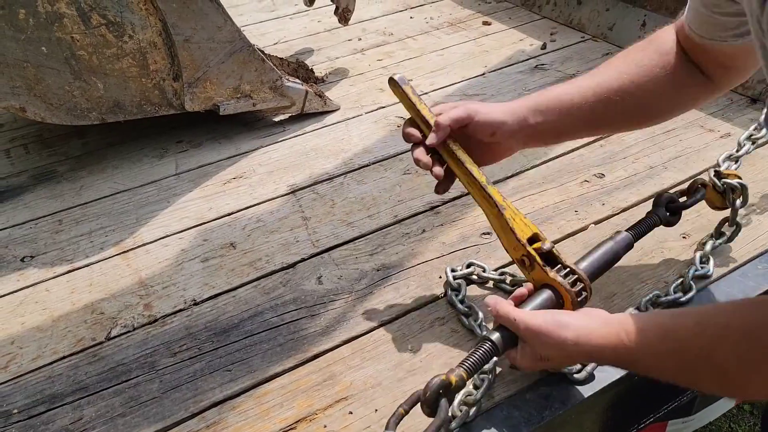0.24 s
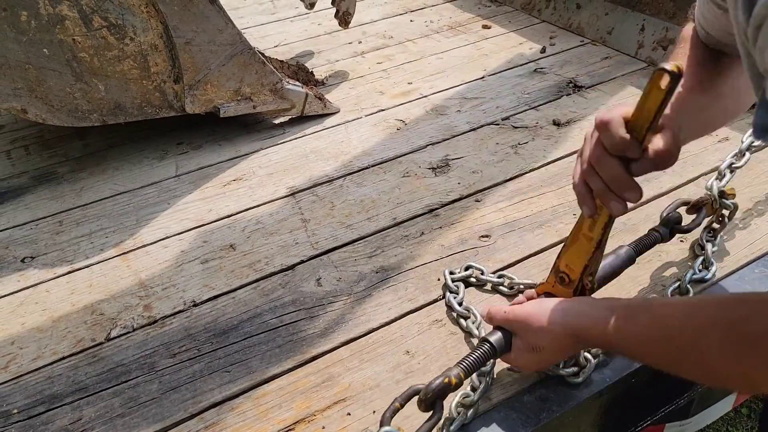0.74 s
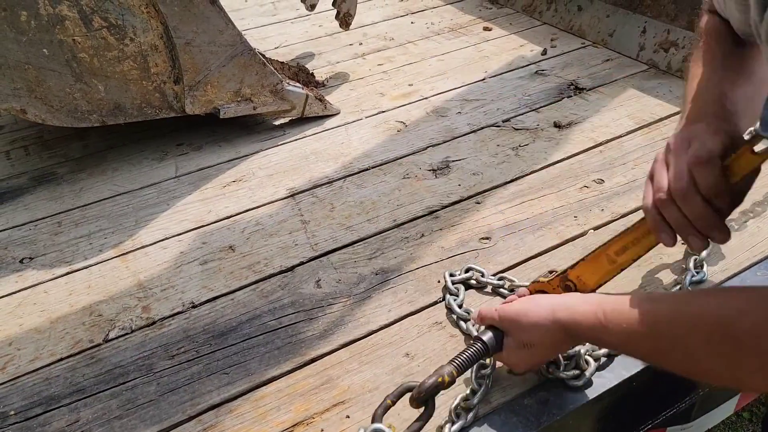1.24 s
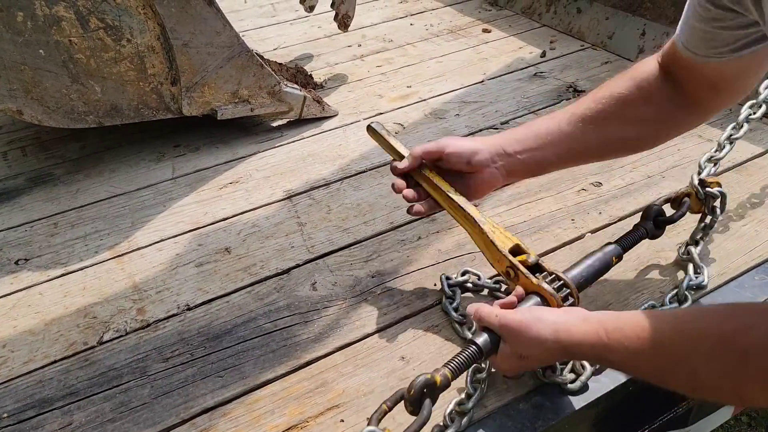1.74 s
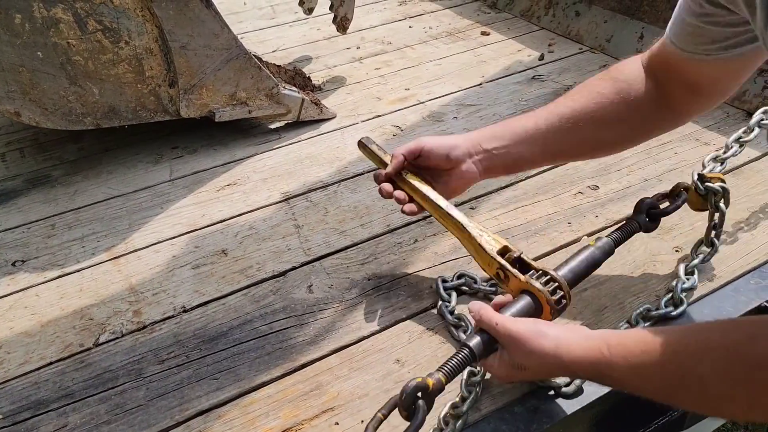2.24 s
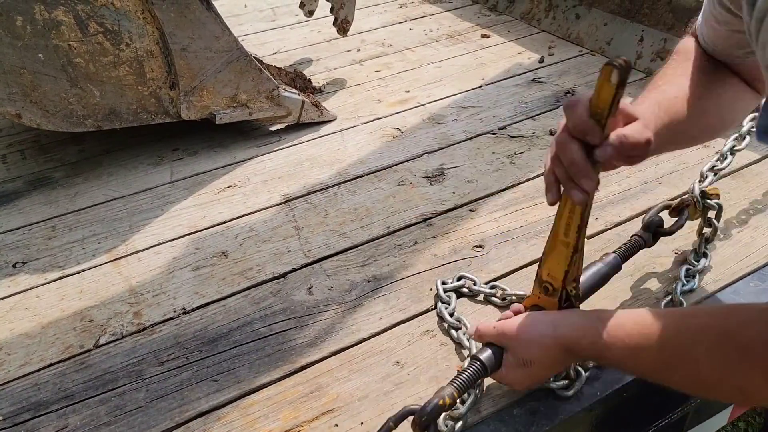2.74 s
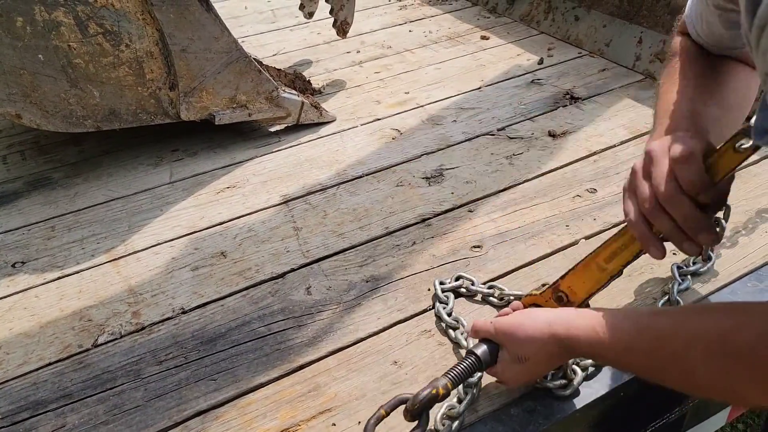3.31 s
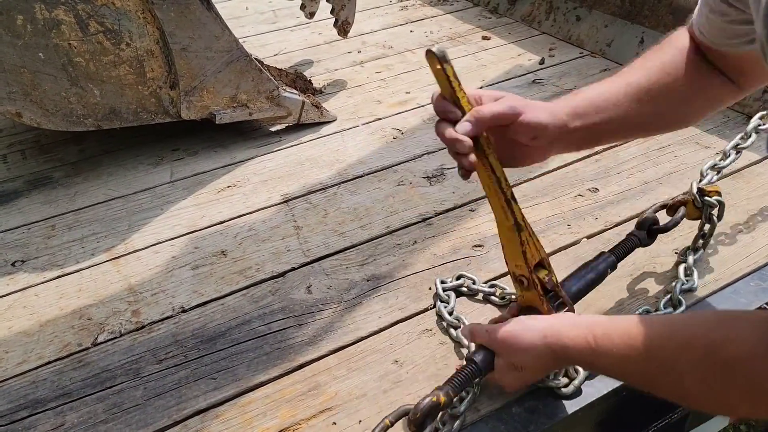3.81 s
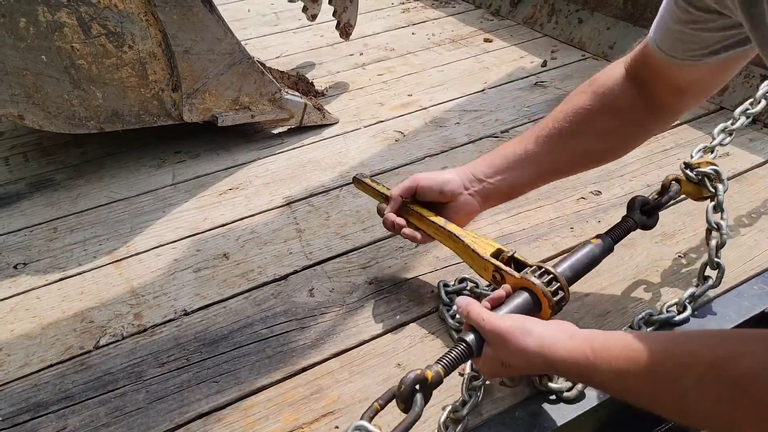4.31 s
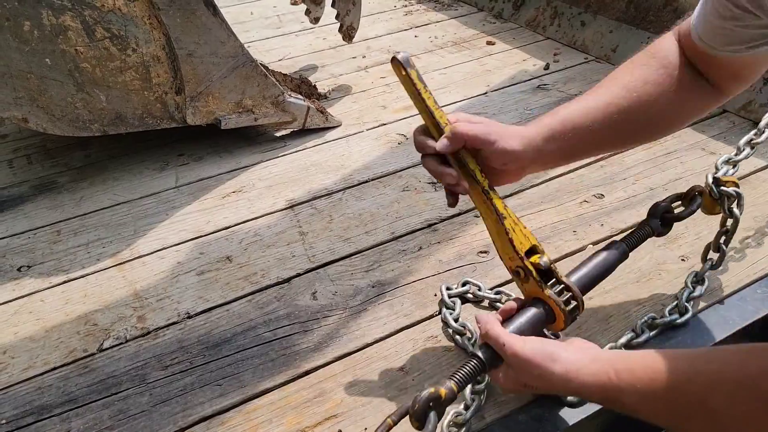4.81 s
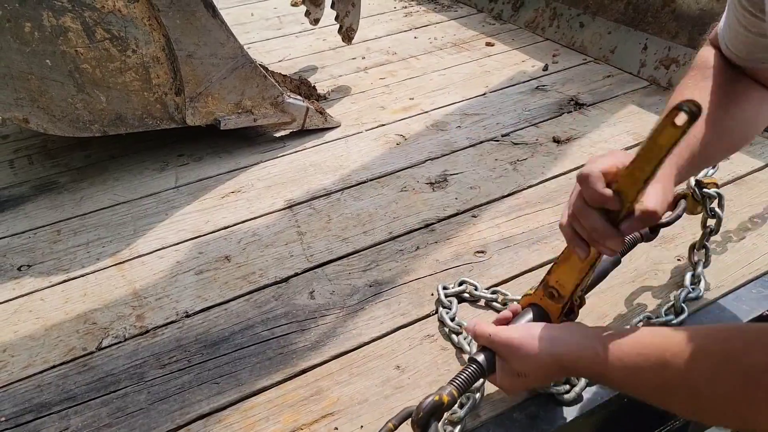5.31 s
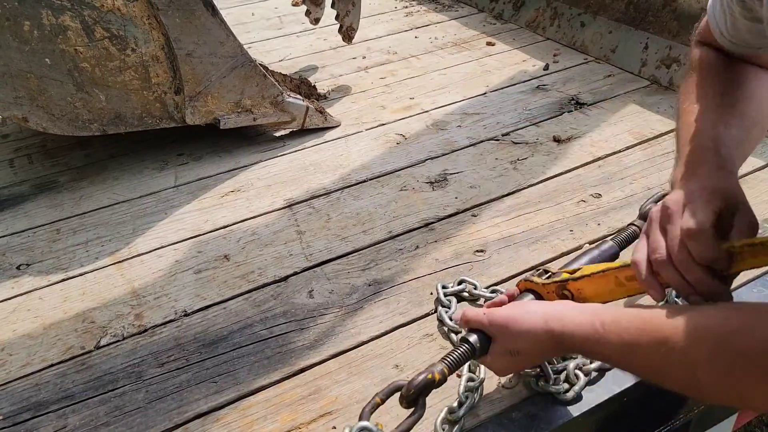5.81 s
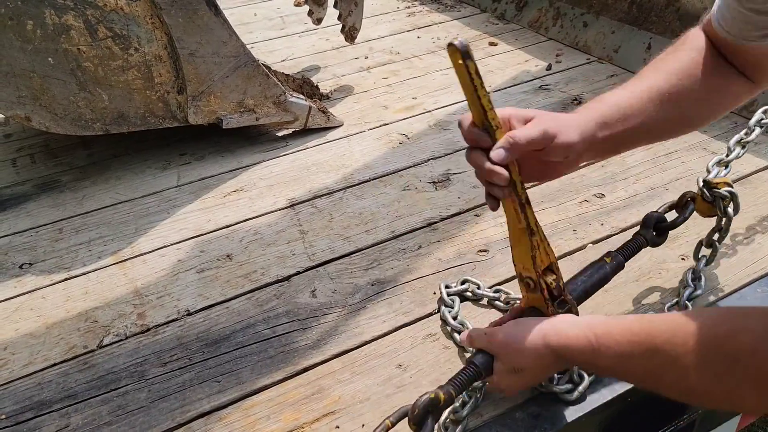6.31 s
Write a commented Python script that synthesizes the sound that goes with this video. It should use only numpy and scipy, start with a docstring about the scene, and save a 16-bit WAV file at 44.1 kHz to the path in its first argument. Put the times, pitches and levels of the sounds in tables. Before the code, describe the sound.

Close by, a chain is tightened with a hand ratchet in about eleven even strokes. Slack metal clanks and knocks on wooden trailer boards, the pawl snaps over a few teeth in a quick bright run, and another clank follows as the handle turns and the chain pulls tight. Links tinkle in between. The setting is an open yard with little echo, a soft hush and light wind on the microphone.

```python
"""Outdoors, on a wooden trailer deck: a ratchet load binder is cranked.
On each back swing the slack binder and chain clank, the deck thuds and the pawl snaps over 4-6 teeth.
At the turn of the handle the pawl seats and the chain clanks taut.
Light wind rumbles on the microphone over a distant hush."""
import sys
import numpy as np
from scipy import signal
from scipy.io import wavfile

SR = 44100
rng = np.random.default_rng(int(sys.argv[2]) if len(sys.argv) > 2 else 0)


def wrap_up_sound(samples):
    """Save the sound to the file named by the first command line argument, as 16-bit audio."""
    columns = np.atleast_2d(samples).T
    # keep every value between -1 and 1, then stretch to whole-number steps
    tamed = np.clip(columns, -1, 1)
    steps = np.round(tamed * 32767).astype(np.int16)
    wavfile.write(sys.argv[1], SR, steps)


N = 288840
EDGES_HZ = np.geomspace(22, 17000, 27)
CENTRES_HZ = np.sqrt(EDGES_HZ[1:] * EDGES_HZ[:-1])
RING_T_S = np.arange(int(.3 * SR)) / SR

# load comes off: main clank t/s, level/dB, first knock lead/s, level/dB, chain fall/s, landing level/dB
RELEASES = [(0.0014, -18, 0.029, -32, 0.0075, -21), (0.594, -19, .052, -26, .021, -16),
            (1.2113, -15.5, 0.03, -23, 0.031, -19.5), (1.8822, -12.5, 0.037, -35.5, 0.07, -20.5),
            (2.589, -14, 0.054, -21, 0.011, -24), (3.2356, -15.5, 0.027, -25.5, 0.063, -21),
            (3.87, -12.5, 0.016, -26, .03, -17.5), (4.5082, -12.5, 0.018, -27, .068, -13),
            (5.1611, -10.5, 0.025, -29, .021, -29.5), (5.7732, -10, 0.023, -34, 0.041, -17),
            (6.4018, -15.5, .0285, -22, 0.021, -21)]
# dense modes of a struck link: f/Hz, density/dB, t60/s
LINK_BANDS = [(500, 0.5, 0.02), (1440, 4, 0.0047), (2780, 10.5, 0.012), (5680, 6, 0.021),
              (8830, -26.5, 0.023), (16160, -12.5, 0.0088)]


def pawl(bands):
    """The pawl scrapes up a tooth and its spring throws it on the next: wheel clacks, pawl pings."""
    # dense ratchet modes: f/Hz, density/dB, t60/s
    clack_bands = [(300, -16.5, 0.096), (983, -2.5, 0.021), (2720, -1.5, 0.087), (5830, 3, 0.018),
                   (8100, -5, .025), (12500, -6.5, .022), (15500, -1.5, 0.047)]
    # wheel and handle: f/Hz, level/dB, t60/s
    wheel_modes = [(2000, -4, 0.02), (2950, -0.5, 0.03), (3367, -4.5, 0.021), (4454, -6.5, 0.029),
                   (6630, -7.5, 0.033), (6895, -7.5, 0.041)]
    t = np.arange(int(.06 * SR)) / SR
    slide_s, pan_spread_db = .009, 2.8
    out, decay = np.zeros((2, N)), decays(clack_bands, t)
    slide_env = decays(clack_bands, 0 * t) * (t < slide_s) * t / slide_s
    crack_env = decay * np.exp(-t / .0007)
    for s, clack_db, ping_db in teeth():
        snap = rattle(dense_modes(bands, decay), spread_s=.0032, bounce_db=5, count=3)
        wheel = ring(wheel_modes, t, spread_db=5, detune=.025)
        wheel = rattle(wheel, spread_s=.003, bounce_db=-4.5, count=2)
        crack = dense_modes(bands, crack_env)
        clack = from_db(clack_db - 10) * (snap + from_db(-.6) * wheel + from_db(-7) * crack)
        ping = from_db(ping_db - 2.5) * chatter(t, spread_s=.005, count=3)
        pan = from_db(rng.normal(0, pan_spread_db) * np.array([[.5], [-.5]]))
        add(out, s - slide_s, from_db(clack_db - 24) * dense_modes(bands, slide_env))
        add(out, s + .0008, clack * pan)
        add(out, s + .00099, ping * pan * from_db([[.9], [-.9]]))
    return out


def teeth():
    """The handle slows, and slower teeth clack softer. Rows: t/s, clack/dB, ping/dB."""
    # back swings: first tooth t/s, last but one t/s, last t/s, teeth,
    # clack/dB, first ping/dB, ping step/dB per tooth, last ping/dB
    swings = [(0.0172, 0.0833, 0.1211, 4, -11.5, -9.5, -2.5, -20),
              (0.644, 0.7134, 0.7514, 4, -13, -12, -1.2, -20),
              (1.273, 1.3422, 1.3786, 4, -12, -10.5, -5.5, -21),
              (1.9252, 2.031, 2.094, 5, -13.5, -16, 2, -19.5),
              (2.6232, 2.693, 2.7262, 4, -13.5, -10, -1.2, -16.5),
              (3.271, 3.3672, 3.4123, 5, -13, -11.5, 0.46, -42),
              (3.8925, 4.017, 4.0745, 6, -13.5, -21.5, 2, -16),
              (4.5667, 4.6567, 4.7238, 5, -12, -11, -2.5, -15.5),
              (5.2, 5.287, 5.3458, 5, -14.5, -10.5, -1.5, -38),
              (5.83, 5.8948, 5.947, 4, -13, -17, 0, -22.5),
              (6.4327, 6.492, 6.5227, 4, -15.5, -7.5, -5.5, -13.5)]
    gap_growth, gap_doubling_db = .03, -5.5
    rows = []
    for first_s, penultimate_s, last_s, count, clack_db, ping_db, step_db, last_ping_db in swings:
        k = np.arange(round(count) - 1)
        travel = k * (1 + gap_growth * (k - 1) / 2)
        times_s = np.append(first_s + (penultimate_s - first_s) * travel / travel[-1], last_s)
        gap_ratio = np.append(1, np.diff(times_s) / (times_s[1] - times_s[0]))
        clacks_db = clack_db + gap_doubling_db * np.log2(gap_ratio)
        pings_db = np.append(ping_db + step_db * k, last_ping_db)
        rows += zip(times_s, clacks_db, pings_db)
    return rows


def chatter(t, spread_s, count):
    """The pawl skips on the tooth; each touch rings it anew."""
    # pawl: f/Hz, level/dB, t60/s
    pawl_modes = [(9054, 0, .033), (9370, -1, .033), (10755, -7, .033), (11003, -10, .03),
                  (15500, -14, .025)]
    out = np.zeros((2, len(t)))
    for k, jitter in enumerate(rng.random(count)):
        age = (k + jitter * (k > 0)) / count
        add(out, age * spread_s, np.exp(-age) * ring(pawl_modes, t, spread_db=4, detune=.009))
    return unit_blow(out)


def slack():
    """Slack opens and closes. Clanks: t/s, level/dB, body/dB, ring/dB. Thuds: t/s, level/dB."""
    # load taken up: pawl seats t/s, level/dB, chain taut delay/s, level/dB
    take_ups = [(0.2585, -21, 0.0034, -23.5), (0.368, -28, 0.003, -29.5), (0.916, -16.5, 0.014, -17),
                (1.5262, -15.5, 0.03, -14), (2.212, -16, 0.013, -16.5), (2.8991, -17.5, 0.016, -19),
                (3.541, -23.5, 0.01, -19.5), (4.1942, -27.5, .0189, -15), (4.8169, -24.5, 0.024, -21),
                (5.4591, -20, 0.033, -19), (6.0671, -17, 0.0063, -22)]
    # hanging chain nudges the planks: t/s, level/dB
    nudges = [(2.827, -30.5), (3.509, -31), (6.325, -32)]
    slack_ring_db, taut_ring_db, usual_landing_db = 4, 3.5, -19
    clanks, thuds = [], list(nudges)
    for s, level_db, lead_s, knock_db, fall_s, landing_db in RELEASES:
        # links clank again during the fall, louder with a heavier landing
        run_out_db = level_db - 2.5 + .49 * (landing_db - usual_landing_db)
        clanks += [(s - lead_s, knock_db, knock_db - 11.5, slack_ring_db),
                   (s, level_db, level_db - 11.5, slack_ring_db),
                   (s + .72 * fall_s, run_out_db, landing_db - 2.5, slack_ring_db)]
        thuds.append((s + fall_s, landing_db))
    for s, seat_db, delay_s, taut_db in take_ups:
        clanks += [(s, seat_db, seat_db - 11.5, taut_ring_db),
                   (s + delay_s, taut_db, taut_db - 12, taut_ring_db)]
        thuds.append((s + delay_s + .00771, taut_db - 11))   # taut chain jolts the deck
    return clanks, thuds


def binder(bands, clanks):
    """A slide, a crack and a rattle of links ring the steel; the heavy low modes swell just after."""
    # barrel, hooks and chain: f/Hz, level/dB, t60/s
    binder_modes = [(600, -6, .17), (715, -1, .17), (868, -8, .17), (1318, -3, .14), (1470, -8, .11),
                    (1628, -4, .14), (1754, -8, .11), (2600, 4, .13), (2675, -2, .1), (2745, -1, .1),
                    (2890, -3, .1), (3090, -3, .1), (3227, -3, .12), (3335, -3, .12), (3885, -6, .09),
                    (4235, -3, .11), (4420, -6, .09), (4844, -10, .08), (6712, -10, .07)]
    # dense chain modes: f/Hz, density/dB, t60/s
    chain_bands = [(400, -31.5, .15), (1015, -8.5, 0.11), (1500, 10, 0.06), (2100, -5, 0.14),
                   (2685, 11, 0.15), (4000, -2.5, 0.11), (5700, 2.5, 0.13), (7760, -12, 0.14),
                   (13000, -17, 0.12), (14900, -10, 0.034)]
    # dense barrel modes: f/Hz, density/dB, t60/s
    body_bands = [(150, -11, 0.16), (389.5, -6.5, 0.13), (700, 0.5, 0.21), (1040, -4, 0.028),
                  (1341, 8.5, 0.26), (2230, -58.5, 0.097), (5000, -45.5, .05)]
    out = np.zeros((2, N))
    chain_env, crack_env = decays(chain_bands, RING_T_S), decays(LINK_BANDS, RING_T_S)
    body_env = decays(body_bands, RING_T_S) * (1 - np.exp(-RING_T_S / .029))
    tone_attack = 1 - np.exp(-RING_T_S / .0027)
    for s, level_db, body_db, ring_db in clanks:
        links = rattle(dense_modes(bands, chain_env), spread_s=.02, bounce_db=-2.5, count=4)
        tones = tone_attack * ring(binder_modes, RING_T_S, spread_db=1.5, detune=.003)
        crack = dense_modes(bands, crack_env)
        slide = dense_modes(bands, chain_env)
        clank = unit_blow(links + from_db(ring_db) * tones + from_db(-3.5) * crack)
        add(out, s - .006, from_db(level_db - 22) * slide)
        add(out, s, from_db(level_db - 4) * clank)
        add(out, s, from_db(body_db - 3) * dense_modes(bands, body_env))
    return out


def deck(bands, thuds):
    """The chain knocks the planks: a dull thud and a short boom."""
    # dense deck modes: f/Hz, density/dB, t60/s
    deck_bands = [(60, -15.5, 0.52), (177, -3, 0.57), (262, -13, 0.44), (356, 1.5, 0.6), (450, 7, 0.043),
                  (600, -1, 0.051), (1000, 6, 0.039), (3000, -37, .06)]
    # planks: f/Hz, level/dB, t60/s
    plank_modes = [(340.3, -7, 0.37), (372.7, -4, 0.28), (635.3, 6, 0.091)]
    out, decay = np.zeros((2, N)), decays(deck_bands, RING_T_S)
    for s, level_db in thuds:
        boom = ring(plank_modes, RING_T_S, spread_db=1.5, detune=.023)
        add(out, s, from_db(level_db - 9) * (dense_modes(bands, decay) + boom))
    return out


def settling_links(bands, count):
    """After each release, single links slip against each other at uneven moments."""
    settle_s, fade_db = .11, -6.5
    slips = []
    for s, level_db, *_ in RELEASES:
        ages = (np.arange(count) + rng.random(count)) / count
        slips += [(s + settle_s * age, level_db + fade_db * age) for age in ages]
    return blows(bands, slips, LINK_BANDS, gain_db=-14)


def jingle(bands, clanks, count):
    """Links of the loose chain end touch after each clank, and now and then on their own."""
    # lightly touched link: f/Hz, density/dB, t60/s
    tink_bands = [(800, -18, .04), (2960, 1, 0.041), (8000, -10, 0.08), (16100, -12, 0.014)]
    # stray touches: t/s, level/dB
    ticks = [(0.196, -28), (0.8727, -32), (1.036, -37.5), (1.738, -33), (3.0817, -35), (4.421, -35.5),
             (4.9206, -26), (5.582, -32), (5.6676, -28)]
    swing_s = .081
    touches = []
    for s, level_db, *_ in clanks:
        for age, weakness in rng.random((count, 2)):
            touches.append((s + swing_s * age, level_db - 10 * age - 10 * weakness))
    return blows(bands, touches, tink_bands, gain_db=-17) + blows(bands, ticks, tink_bands, gain_db=-13)


def near_echo(bands, x):
    """Scatter from the planks and a bucket close by."""
    # reflections: f/Hz, density/dB, t60/s
    near_bands = [(492, 0.5, 0.33), (3044, -5, 0.12), (9000, -4, 0.088), (15000, -4, 0.12)]
    return reflections(bands, x, near_bands, length_s=.25, wet_db=-12.5)


def yard_echo(bands, x):
    """Long, faint echo of the yard."""
    # reflections: f/Hz, density/dB, t60/s
    yard_bands = [(100, 2.5, 1.2), (402, -0.5, 0.69), (791, -10.5, 1), (1424, -7, 0.57), (3000, -6, 0.33),
                  (5100, -17, 1.45), (9130, -7.5, 0.2), (15000, -29, .3)]
    return reflections(bands, x, yard_bands, length_s=1.3, wet_db=-20.5)


def wind(bands):
    """Lumpy rumble on the microphone; stronger gusts make smaller eddies and sound brighter."""
    # gusts: t/s, level/dB
    gusts = [(0.0, -56), (0.56, -37.5), (0.69, -45), (1.07, -36), (1.39, -50), (1.55, -39), (2.04, -45),
             (2.72, -44), (2.74, -49), (3.96, -44.5), (4.0, -39), (4.12, -65.5), (4.54, -52), (4.58, -44),
             (5.05, -56.5), (5.11, -41.5), (5.44, -57), (5.49, -41.5), (5.97, -44.5), (6.26, -58.5),
             (6.46, -44), (6.55, -49)]
    # rumble spectrum: f/Hz, density/dB
    rumble_bands = [(25, -17), (45, -3.5), (70, 1), (110, -6), (160, -17), (300, -31), (800, -50.5),
                    (3000, -77)]
    pivot_hz, tilt_per_octave, flutter_hz, flutter_db = 70, .18, 12, 2.5
    gust_db = np.interp(np.arange(N) / SR, *np.transpose(gusts))
    lowpass = signal.butter(2, flutter_hz, fs=SR, output="sos")
    eddies = unit_rms(signal.sosfilt(lowpass, rng.standard_normal((2, N))))
    octaves = np.minimum(np.log2(CENTRES_HZ / pivot_hz), 1)
    tilt_db = tilt_per_octave * np.outer(octaves, gust_db - gust_db.mean())
    colour_db = per_band(rumble_bands)[0][:, None] + tilt_db
    rumble = np.einsum("bt,bct->ct", from_db(colour_db), bands)
    return from_db(gust_db + 1.86) * unit_rms(rumble * from_db(flutter_db * eddies))


def hush(bands):
    """Steady distant noise."""
    # spectrum: f/Hz, density/dB
    air_bands = [(100, -5), (250, -6), (700, -10), (1300, -15), (3000, -16), (5000, -28.5), (8000, -30),
                 (15500, -37.5)]
    air = np.tensordot(from_db(per_band(air_bands)[0]), bands, axes=1)
    return from_db(-52.5) * unit_rms(air)[:, ::-1]   # reversed: decorrelated from the wind


def dense_modes(bands, envelopes):
    """Modes too dense to tell apart: a random stretch of noise, shaped band by band."""
    size = envelopes.shape[1]
    start = rng.integers(SR // 10, N - size)
    return unit_blow(np.einsum("bct,bt->ct", bands[:, :, start:start + size], envelopes))


def ring(modes, t, spread_db, detune):
    """Clear modes; each blow reseats the parts, shifting pitch, strength and phase."""
    hz, level_db, t60_s = np.transpose(modes)
    hz = hz * (1 + detune * rng.standard_normal(len(hz)))
    gains = from_db(level_db + spread_db * rng.standard_normal((2, len(hz))))
    phasors = np.exp(2j * np.pi * rng.random((2, len(hz))))
    poles = 2j * np.pi * hz - np.log(1000) / t60_s
    return unit_blow(np.real((gains * phasors) @ np.exp(np.outer(poles, t))))


def rattle(sound, spread_s, bounce_db, count):
    """A first contact, then uneven, dying bounces within twice spread_s."""
    out = sound.copy()
    for k, (jitter, size) in enumerate(rng.random((count, 2))):
        age = 2 * (k + jitter) / count
        gain = from_db(bounce_db) * np.exp(-age) * (.5 + size) * rng.choice([-1, 1])
        add(out, age * spread_s, gain * sound)
    return unit_blow(out)


def blows(bands, events, table, gain_db):
    """Single contacts on one object."""
    out, decay = np.zeros((2, N)), decays(table, RING_T_S)
    for s, level_db in events:
        add(out, s, from_db(level_db + gain_db) * dense_modes(bands, decay))
    return out


def reflections(bands, x, table, length_s, wet_db):
    """Diffuse echo that builds quickly and dies band by band."""
    t = np.arange(int(length_s * SR)) / SR
    response = dense_modes(bands, decays(table, t) * (1 - np.exp(-t / .0029)))
    response /= np.sqrt(np.sum(response ** 2) / 2)
    return from_db(wet_db) * signal.fftconvolve(x, response, axes=1)[:, :N]


def noise_bands(correlation):
    """Stereo noise in bands, shape (bands, 2, N); neighbours use independent noise."""
    white = np.sqrt(1 - correlation) * rng.standard_normal((2, 2, N))
    white += np.sqrt(correlation) * rng.standard_normal((2, 1, N))
    filters = [signal.butter(2, hz, "band", fs=SR, output="sos") for hz in zip(EDGES_HZ, EDGES_HZ[1:])]
    return np.array([signal.sosfilt(sos, white[k % 2]) for k, sos in enumerate(filters)])


def per_band(table):
    """Table columns interpolated at the band centres."""
    hz, *columns = np.transpose(table)
    return [np.interp(np.log(CENTRES_HZ), np.log(hz), column) for column in columns]


def decays(table, t):
    """Band amplitudes at times t after a blow."""
    level_db, t60_s = per_band(table)
    return from_db(level_db[:, None] - 60 * t / t60_s[:, None])


def add(track, s, sound):
    """Mix a sound in at time s, no earlier than 0."""
    part = track[:, max(0, int(s * SR)):][:, :sound.shape[1]]
    part += sound[:, :part.shape[1]]


def unit_blow(x):
    """Scale to the energy of 10 ms of stereo at rms 1."""
    return x / np.sqrt(np.sum(x ** 2) / (2 * .01 * SR) + 1e-20)


def unit_rms(x):
    return x / np.sqrt(np.mean(x ** 2) + 1e-20)


def from_db(db):
    return 10 ** (np.asarray(db) / 20)


def scene():
    """Binder slightly right, wind and hush slightly left."""
    bands = noise_bands(correlation=.21)
    clanks, thuds = slack()
    tool = jingle(bands, clanks, count=2) + deck(bands, thuds)
    clicks = pawl(bands)
    tool += clicks + near_echo(bands, clicks) + binder(bands, clanks) + settling_links(bands, count=5)
    tool[0] = np.pad(tool[0], (4, 0))[:N]   # reaches the left 4 samples later
    tool += yard_echo(bands, tool)
    background = wind(bands) + hush(bands)
    return tool * from_db([[-.5], [.5]]) + background * from_db([[1.3], [-1.3]])


def record(dry):
    """Soft clip, then a steep low-pass."""
    cutoff_hz = 15850
    lowpass = signal.ellip(10, .2, 70, cutoff_hz, fs=SR, output="sos")
    return signal.sosfilt(lowpass, 1.295 * np.tanh(dry / 1.29))


dry = scene()
out = record(dry)
wrap_up_sound(out)
```